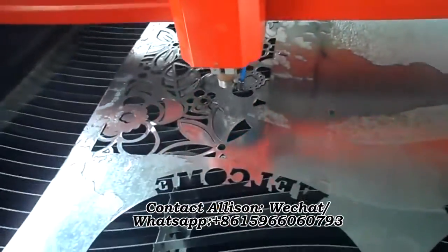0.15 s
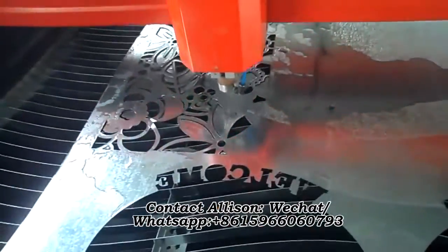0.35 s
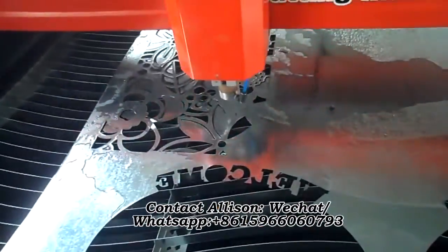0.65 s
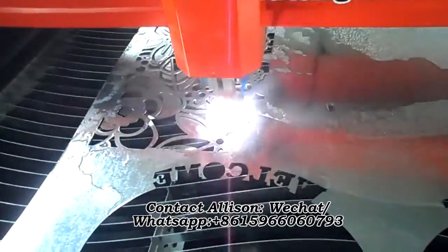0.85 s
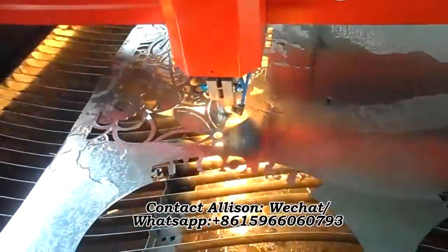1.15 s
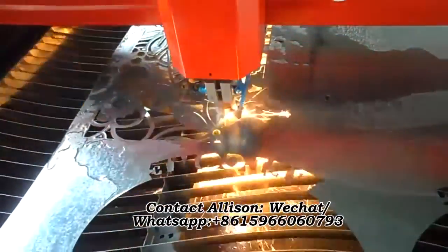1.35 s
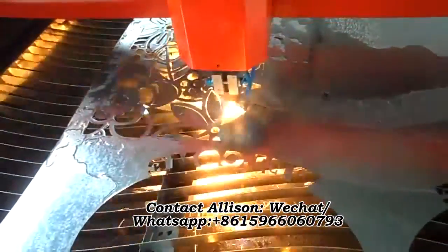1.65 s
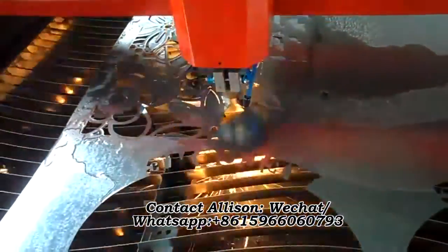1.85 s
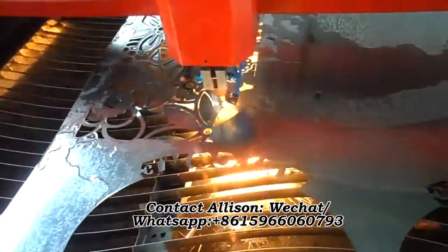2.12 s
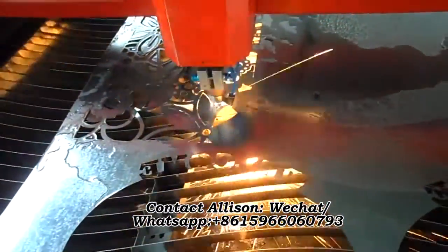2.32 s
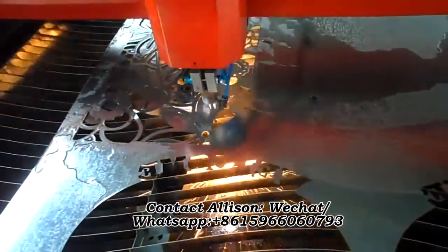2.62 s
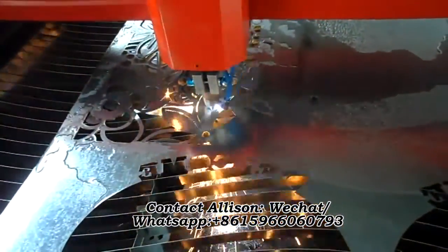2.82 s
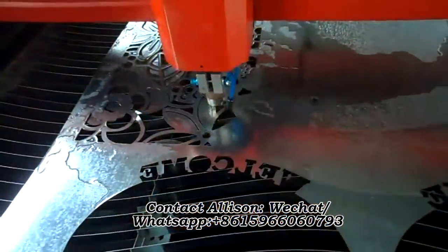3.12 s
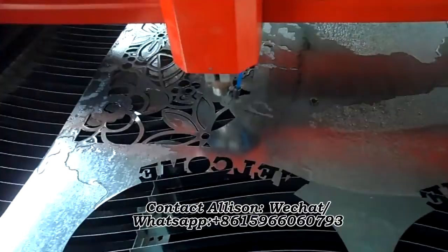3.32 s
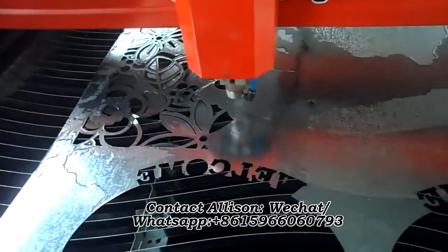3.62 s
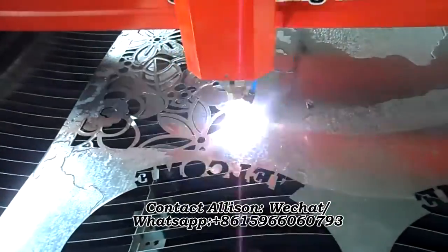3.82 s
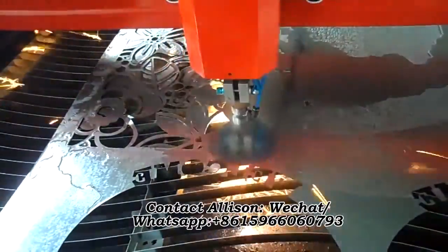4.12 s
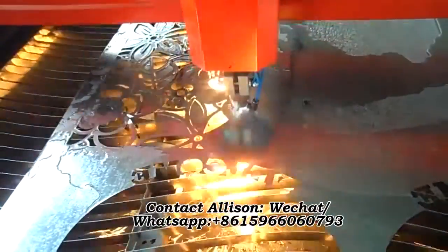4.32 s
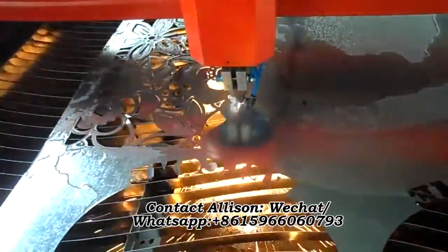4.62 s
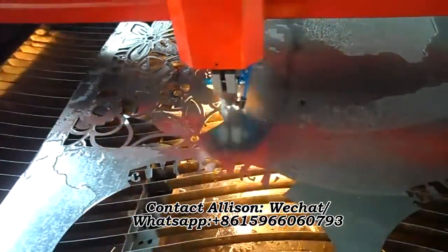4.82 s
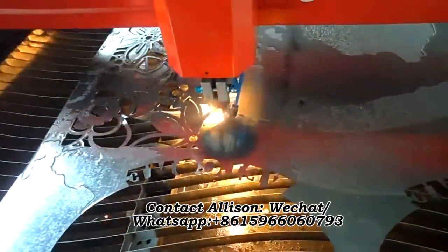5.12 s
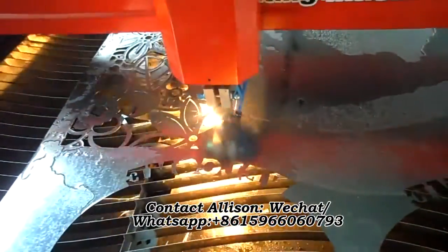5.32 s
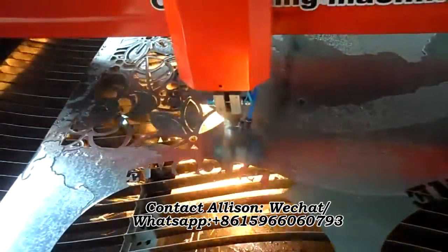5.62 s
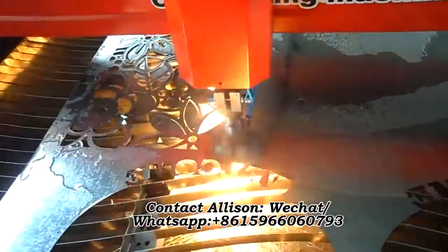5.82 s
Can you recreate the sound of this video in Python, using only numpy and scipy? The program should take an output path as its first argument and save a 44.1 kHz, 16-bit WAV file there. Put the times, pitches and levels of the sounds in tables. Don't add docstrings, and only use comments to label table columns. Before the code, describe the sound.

Loud pressurized gas hiss and sizzling jet cutting thin sheet metal in two passes, separated by a short quieter gap with sharp clacks.

```python
import sys
import numpy as np
from scipy import signal
from scipy.fft import rfft, irfft
from scipy.io import wavfile
from scipy.ndimage import uniform_filter1d

SR = 44100
rng = np.random.default_rng(int(sys.argv[2]) if len(sys.argv) > 2 else 0)


def natural_amplitude(level_db):
    exponent = np.asarray(level_db, float) / 20
    return 10 ** exponent


def waveform_to_disk(signal):
    frames = np.transpose(np.atleast_2d(signal))
    scaled = np.clip(frames, -1, 1) * 32767
    samples = np.round(scaled).astype(np.int16)
    wavfile.write(sys.argv[1], SR, samples)


N = 262395

CUTOFF_HZ = 15745
SPLITS_HZ = [850, 3900, 9500]

STAGE_S = [
    0,
    .911,
    1.121,
    3.0322,
    3.365,
    3.9938,
    4.219,
    5.95,
]
FADE_S = [.001, .004, .006, .006, .09, .004, .03, .001]
# table rumble in dB, splash in dB, jet hiss in dB, sizzle in dB,
# share of the microphone's level swing left in the jet (0 to 1).
BALANCE_DB = [
    (-37, -20, -23.5, -26, 0.15),
    (-38, -26, -22, -23.5, .45),
    (-37.5, -26, -25, -24.5, 0.26),
    (-38.5, -34, -33, -35, 0.63),
    (-34, -28, -31, -34, 0.78),
    (-34, -23, -21, -22.5, 0.32),
    (-33, -26, -23, -24.5, 0.6),
]

# frequency in Hz, level in dB.
BLOW_COLOUR = [(12, -38), (20, -9), (153, -7), (239, -8), (363, -19), (599, -7.5), (770, -18), (1140, -10),
               (1730, -12.5), (2620, -1), (3980, -13.5), (5260, -12.5), (7350, -3), (10600, -17.5),
               (15600, -12)]
PIERCE_COLOUR = [(12, -43), (20, -17), (119, -15), (186, -9.5), (353, -25), (394, -20), (814, -11),
                 (1050, -16), (1630, -2.5), (1830, -3), (2410, 1.5), (3870, -7), (6580, -4.5),
                 (12100, -7.5), (15600, -7)]
CUT_COLOUR = [(12, -39), (20, -4), (145, -7), (202, -4.5), (373, -17), (582, -14.5), (1540, -6.5),
              (1830, -8.5), (2100, -3), (2480, -5.5), (3280, -2.5), (3770, -5.5), (6050, -5.5),
              (12100, -11), (15600, -13.5)]
REST_COLOUR = [(12, -34), (20, -7), (93, -4), (186, -4), (267, -4), (334, -15), (669, -11), (770, -18.5),
               (1590, -19), (3190, -16.5), (4840, -22), (7560, -9), (8220, -14), (15600, -13)]
BLOW_AGAIN_COLOUR = [(12, -38), (20, -4.5), (113, -4.5), (226, -7), (373, -16.5), (669, -8.5), (791, -16.5),
                     (1140, -6.5), (1780, -6.5), (2770, 0), (3770, -11.5), (5260, -12.5), (7560, -10),
                     (10900, -22.5), (15600, -19)]
PIERCE_AGAIN_COLOUR = [(12, -44), (20, -8), (95, -9), (137, -11.5), (176, -10), (353, -19), (383, -16),
                       (441, -13), (616, -12), (708, -15), (1270, -17), (2480, -2.5), (3100, -10.5),
                       (6220, -3), (15600, -2)]
CUT_AGAIN_COLOUR = [(12, -37), (20, -6), (208, -5.5), (373, -16), (935, -9.5), (1080, -3), (1780, -1.5),
                    (2220, 0.5), (2620, -3.5), (3100, 0), (4100, -6.5), (6050, -4.5), (8690, -9),
                    (12500, -6), (15600, -9)]

# frequency in Hz, width in Hz, lift in dB.
BLOW_MODES = [(35, 11, -5), (82, 14, 2), (707, 12, 7.5), (1010, 12, 2.5), (622, 12, -0.5), (680, 35, 1.5),
              (480, 14, 3), (418, 6.8, 12.5), (2260, 160, -1), (2500, 390, -0.5), (3120, 170, 2),
              (3850, 470, -6), (4930, 150, 0), (6170, 320, 4), (7740, 130, 1.5), (9300, 300, 2.5),
              (10400, 2200, -2)]
PIERCE_MODES = [(612, 12, 7), (370, 54, -2), (1810, 97, -10), (3860, 240, -4), (6380, 450, 5.5),
                (7250, 250, 3), (11900, 500, 7)]
CUT_MODES = [(590, 56, 6), (210, 22, 5), (35, 9.6, 3.5), (87, 29, 4), (421, 18, 5.5), (506, 13, 4.5),
             (676, 21, 2), (1057, 59, 5), (344, 37, 0.5), (1790, 57, -6.5), (3260, 280, 2),
             (3650, 780, -3.5), (5900, 180, 1.5), (6100, 1100, 1.5), (7380, 220, 1.5)]
REST_MODES = [(3080, 280, 5), (2600, 300, -2), (5300, 900, 6.5), (1200, 200, 2), (7400, 300, 1)]
# frequency in Hz, width in Hz, lift in dB.
FIRST_CUT_MODES = [(2470, 220, -4.5), (4650, 83, -2.5), (5500, 250, -2.5), (9500, 1300, -3),
                   (10800, 250, 2), (12700, 250, 1), (13900, 300, 2), (5750, 200, 0.5)]
BLOW_AGAIN_MODES = [(1790, 120, -7), (2330, 80, 5), (2820, 220, 3.5), (3130, 250, -4), (3450, 120, 5.5),
                    (3870, 200, 2.5), (4870, 200, -3), (6100, 200, 0), (10300, 400, 1), (15400, 400, 1)]
PIERCE_AGAIN_MODES = [(1250, 200, 5), (2500, 200, -1), (4430, 200, 0), (5370, 300, 1.5), (9200, 250, -1),
                      (10800, 400, -0.5), (12300, 200, -2), (13500, 400, 0)]
CUT_AGAIN_MODES = [(2240, 100, 2.5), (3800, 200, 0), (5920, 370, -4.5), (8900, 300, -0.5), (10200, 300, -2),
                   (11250, 220, 0.5), (12000, 250, 0), (12400, 200, 5), (13700, 300, 3)]

# time in seconds, level in dB.
GAIN = [(0, 11), (.33, 7), (.8, 12.5), (.913, 10.5), (.925, 4.5), (1.3, 3), (2.3, 6.5), (2.5, 2.5),
        (3.0, 4), (3.2, 0.5), (3.65, 3), (3.994, 6), (4.006, -0.5), (4.4, -3.5), (5.3, 1.5), (5.76, 2.5),
        (5.93, -1.5), (5.95, -0.5)]
# peak in seconds, hiss in dB,
# rise in seconds, fall in seconds, extra sizzle in dB.
FLARES = [(1.127, -4, 0.0055, .012, 1.2), (1.2, 0, 0.083, .07, 3.5), (1.39, -3, 0.25, 0.038, -1),
          (1.445, 3.5, .03, 0.081, 0), (1.63, 3.5, 0.14, .07, -0.5), (1.85, 3, 0.036, .02, -3),
          (1.88, -1, .015, 0.063, .3), (2.09, 4, 0.18, 0.077, -3.5), (2.46, 6, 0.1, 0.076, 0.5),
          (2.805, 5, 0.073, 0.1, 1), (2.91, 0, .04, .03, -1), (3.0, 4.5, 0.11, 0.083, 0),
          (3.95, 2.5, 0.31, 0.089, 1), (4.32, 1, 0.083, .12, 3.5), (4.46, -7.5, .03, 0.059, 6),
          (4.59, -2, .12, .06, -5), (4.79, 5.5, .14, 0.14, 0.5), (5.3, 3, .08, .04, -5),
          (5.385, 0.5, 0.035, .05, 5), (5.42, 4, .04, 0.079, -6), (5.51, -1, .06, 0.073, -5),
          (5.69, 2, 0.017, .015, -8), (5.75, 5.5, 0.046, 0.21, -1.5), (5.925, 6, 0.044, 0.06, -2)]
# peak in seconds, level in dB,
# rise in seconds, fall in seconds.
SPLASHES = [(1.127, -4.5, 0.0074, 0.094), (1.21, -3.5, 0.049, 0.026), (1.408, -9, 0.02, 0.059),
            (1.72, 3.5, 0.029, .06), (1.85, 0, .05, .015), (1.88, -2, .015, 0.088), (2.24, 2.5, 0.13, 0.27),
            (2.45, 2, .06, 0.03), (2.69, -2, 0.037, 0.056), (2.8, 2, 0.061, .03),
            (2.89, -5.5, 0.065, 0.045), (3.03, 7.5, 0.054, 0.0054), (3.36, -3, 0.04, 0.12),
            (4.37, -2, 0.23, 0.022), (4.46, -7, .02, 0.055), (4.6, 3, 0.092, 0.061), (4.95, 3, 0.1, 0.25),
            (5.365, -5.5, 0.044, 0.08), (5.7, -5.5, 0.044, 0.048), (5.82, -2.5, .06, .06)]
RUMBLE_IN_SPLASH = 0.23

POP_S = [
    .9116,
    3.0288,
    3.0812,
    3.1037,
    3.994,
]
# crack peak in dB, thump in dB, thump pitch in Hz, crack length in seconds,
# frequency in Hz above which the crack is dull.
POPS = [(-5, -2.5, 1000, .0007, 10000), (-1, -8, 700, .001, 4000), (-5, -20, 1500, .0016, 14000),
        (-6.5, -30, 800, .0005, 7000), (-9, -6, 1400, .0015, 6000)]
CRACK_LOW_HZ = [900, 700, 900, 1900, 900]
# level in dB, fall in seconds.
PUFFS = [(2.5, 0.039), (4, 0.023), (0, .02), (5, 0.016), (2.5, .01)]
PUFF_RISE_S, PUFF_IN_SIZZLE = 0.0022, 0.15

# start in seconds, end in seconds, frequency in Hz,
# width in Hz, level in dB.
WHISTLES = [(1.68, 1.865, 3380, 150, -39), (1.47, 1.64, 12500, 140.0, -29), (1.6, 1.7, 10360.0, 210.0, -31),
            (1.76, 1.87, 6200, 500.0, -26), (1.96, 2.06, 3160, 230.0, -31), (2.17, 2.26, 2790, 200, -25),
            (2.41, 2.53, 7230, 160.0, -25), (4.35, 4.45, 12700.0, 414, -35), (4.35, 4.46, 6600, 310.0, -34),
            (4.76, 4.85, 5130, 200.0, -29), (4.89, 5.07, 5260, 350, -28), (5.17, 5.37, 3200, 600, -32),
            (5.37, 5.45, 12350, 230.0, -26), (5.395, 5.44, 5980, 340, -19.5), (5.44, 5.57, 6100, 130, -33),
            (5.68, 5.78, 12200, 248, -28), (3.45, 3.5, 4320, 120, -42), (3.35, 3.46, 10800, 1500, -37),
            (0.01, .35, 8960, 800, -28.5), (1.15, 1.4, 13000, 1500, -33), (2.66, 2.76, 11000, 2500, -24),
            (3.97, 4.21, 14800, 2000, -26)]
# start in seconds, end in seconds, frequency in Hz, width in Hz,
# level in dB.
MORE_WHISTLES = [(4.56, 5.93, 1075, 100, -39), (5.33, 5.44, 13500, 200, -33), (2.95, 3.03, 6050, 250, -30),
                 (1.68, 1.8, 1550, 150, -36), (3.38, 3.52, 2500, 700, -36), (1.46, 1.72, 6100, 250, -34),
                 (4.85, 5.25, 2280, 250, -36), (1.55, 1.87, 3350, 90, -37), (2.3, 2.84, 3200, 250, -34),
                 (4.09, 4.21, 12500, 1800, -28), (1.28, 1.4, 5000, 900, -31), (5.75, 5.9, 12400, 250, -32),
                 (2.74, 2.84, 12000, 300, -31), (2.76, 2.85, 8150, 200, -33),
                 (4.75, 4.84, 10700, 250, -32), (5.8, 5.94, 11150, 150, -34), (2.0, 2.35, 1100, 90, -40),
                 (1.56, 1.87, 3365, 60, -37), (3.55, 3.99, 7700, 900, -34), (1.82, 1.865, 4700, 500, -27),
                 (1.05, 1.12, 6900, 900, -26), (2.05, 2.13, 4900, 300, -31), (2.4, 2.5, 4700, 1300, -31),
                 (5.7, 5.85, 7500, 200, -35)]
# start in seconds, end in seconds,
# frequency in Hz, width in Hz, level in dB.
EDGE_TONES = [(4.74, 4.89, 7060, 200, -33), (4.67, 4.84, 11370, 160, -27), (5.65, 5.75, 12400, 170, -37),
              (5.56, 5.66, 4200, 150, -32), (5.51, 5.72, 17000, 250, -33), (5.35, 5.51, 12490, 120, -35),
              (1.7, 1.87, 7660, 200, -39), (5.58, 5.78, 9220, 170, -36), (5.54, 5.72, 6100, 110, -28),
              (4.25, 4.38, 10000, 100, -34), (4.26, 4.38, 11250, 120, -33), (1.92, 2.12, 2760, 83, -34.5),
              (1.57, 1.74, 12920, 200, -34), (5.61, 5.67, 1540, 120, -32), (5.06, 5.21, 1980, 76, -33),
              (4.77, 4.87, 2600, 88, -37), (4.96, 5.06, 8180, 100, -32), (2.8, 2.91, 2700, 100, -41.5),
              (1.17, 1.28, 6000, 100, -38), (4.25, 4.45, 2900, 130, -46), (4.27, 4.58, 2500, 140, -46),
              (4.27, 4.45, 5200, 120, -33), (1.6, 1.76, 5600, 150, -36), (1.79, 1.87, 3345, 86, -35),
              (.94, .98, 7000, 250, -23), (1.08, 1.12, 4750, 300, -31.5), (1.44, 1.5, 4150, 150, -33),
              (3.87, 3.93, 7750, 200, -37), (5.65, 5.94, 8180, 400, -35), (4.88, 5.04, 7600, 330, -31),
              (5.52, 5.94, 6800, 150, -32), (.01, .35, 15000, 1200, -31), (5.74, 5.94, 3700, 200, -34),
              (4.99, 5.13, 11000, 300, -32), (.5, .9, 7450, 130, -36), (0.26, 0.58, 2670, 350, -27.5),
              (4.26, 4.55, 10250, 500, -38), (3.74, 3.99, 15450, 300, -38), (0.84, 0.87, 3000, 150, -22),
              (2.05, 2.3, 3000, 80, -34)]
# start in seconds, end in seconds, pitch in Hz,
# wander in Hz, level in dB.
SINGING = [(1.44, 1.56, 3350, 35, -35), (1.555, 1.66, 3355, 25, -30), (1.68, 1.79, 3340, 50, -32),
           (1.79, 1.865, 3330, 45, -26.5), (5.4, 5.44, 6030, 110, -22), (5.43, 5.5, 6120, 60, -25.5),
           (5.5, 5.57, 6090, 40, -34), (.33, .9, 7480, 60, -31), (3.355, 3.42, 2930, 40, -35),
           (1.68, 1.76, 4980, 25, -33), (.66, .9, 2600, 90, -31), (.35, .62, 2620, 90, -31),
           (1.44, 1.54, 6150, 110, -32), (.02, .16, 3050, 90, -31), (3.6, 3.78, 2800, 40, -34),
           (3.8, 3.98, 3400, 50, -37)]
# frequency in Hz, level in dB.
MOTOR_TONES = [(35, -53.5), (86, -57.5), (506, -61), (608.3, -55.5), (662, -56.5), (731, -73),
               (990.5, -53.5), (1252, -56)]
# time in seconds, low edge in Hz,
# high edge in Hz, level in dB.
SIDE_PATCHES = [(.337, 13000, 14600, -35), (.476, 9600, 11100, -41), (2.241, 13000, 14600, -35),
                (2.729, 5600, 7700, -28), (3.426, 8900, 10400, -40), (3.449, 8900, 10400, -38),
                (3.472, 11000, 12500, -40), (4.354, 8200, 9800, -31), (4.61, 9000, 10400, -41),
                (5.926, 6200, 9800, -49)]


def unit(x):
    return x / np.sqrt(np.mean(x ** 2) + 1e-20)


def drift(rate_hz):
    step = 32
    r = np.exp(-2 * np.pi * rate_hz * step / SR)
    slow = signal.lfilter([1], [1, -2 * r, r * r], rng.standard_normal(N // step + 3002))
    slow = unit(slow[3000:])
    return np.interp(np.arange(N) / step, np.arange(len(slow)), slow)


def band(x, hz, width_hz):
    r = np.exp(-np.pi * width_hz / SR)
    ringing = [1, -2 * r * np.cos(2 * np.pi * hz / SR), r * r]
    for _ in range(2):
        x = signal.lfilter([1 - r, 0, r - 1], ringing, x)
    return x


def swings(rows, column):
    t = np.arange(N) / SR
    coarse = t[::16]
    total = np.zeros(len(coarse))
    for row in rows:
        peak, rise, fall = row[0], row[2], row[3]
        total += np.interp(coarse, [peak - rise, peak, peak + fall], [0, row[column], 0])
    return np.interp(t, coarse, total)


def levels():
    flare, splash = swings(FLARES, column=1), swings(SPLASHES, column=1)
    puff_rows = [(s + PUFF_RISE_S, db, PUFF_RISE_S, fall) for s, (db, fall) in zip(POP_S, PUFFS)]
    puff = swings(puff_rows, column=1)
    gain = np.interp(np.arange(N) / SR, *np.transpose(GAIN))
    sizzle = flare + swings(FLARES, column=4) + PUFF_IN_SIZZLE * puff
    return gain, [RUMBLE_IN_SPLASH * splash, splash + puff, flare + puff, sizzle]


def side_patches():
    out, length = np.zeros(N), 2048
    noises = rng.standard_normal((len(SIDE_PATCHES), length))
    for noise, (s, low_hz, high_hz, db) in zip(noises, SIDE_PATCHES):
        edges = [low_hz - 150, high_hz + 150]
        noise = signal.sosfilt(signal.cheby2(8, 50, edges, "band", fs=SR, output="sos"), noise)
        at = round(s * SR) - length // 2
        out[at:at + length] += natural_amplitude(db) * unit(noise) * np.hanning(length)
    return out


def motors(gain):
    t = np.arange(N) / SR
    out = np.zeros(N)
    for hz, db in MOTOR_TONES:
        waver_db = 1.5 * drift(2.4)
        out += natural_amplitude(db + gain + waver_db) * np.sin(2 * np.pi * hz * t)
    return np.sqrt(2) * out


def shop(x):
    t60_s = .15
    t = np.arange(round(.5 * SR)) / SR
    dull_noise = signal.lfilter([.5], [1, -.5], rng.standard_normal(len(t)))
    tail = dull_noise * natural_amplitude(-60 * t / t60_s) * (t > .003)
    return signal.fftconvolve(x, tail / np.sqrt(np.sum(tail ** 2)))[:N]


def pops():
    out, t = np.zeros(N), np.arange(2000) / SR
    cracks = rng.standard_normal((len(POPS), len(t)))
    for crack, s, low_hz, (db, thump_db, hz, length_s, dull_hz) in zip(cracks, POP_S, CRACK_LOW_HZ, POPS):
        at = round(s * SR)
        crack = signal.sosfilt(signal.butter(2, [low_hz, dull_hz], "band", fs=SR, output="sos"), crack)
        burst = crack * np.exp(-t / length_s) * (1 - np.exp(-t / .0003))
        thump = np.sin(2 * np.pi * hz * t) * np.exp(-1.5 * hz * t)
        out[at:at + len(t)] += natural_amplitude(db) * burst / np.abs(burst).max() - natural_amplitude(thump_db) * thump / thump.max()
    return out


def singing():
    out, tremble, throb = np.zeros(N), drift(56), natural_amplitude(3.5 * drift(25))
    for k, (start, end, hz, wander_hz, db) in enumerate(SINGING):
        a, b = round((start - .01) * SR), round((end + 0.012) * SR)
        pitch = hz + wander_hz * np.roll(tremble, 9001 * k)[a:b]
        tone = np.sqrt(2) * np.sin(2 * np.pi * np.cumsum(pitch) / SR)
        fade = signal.windows.tukey(b - a, min(1, .05 * SR / (b - a)))
        out[a:b] += natural_amplitude(db) * tone * np.roll(throb, 7001 * k)[a:b] * fade
    return out


def whistles():
    out = np.zeros(N)
    for start, end, hz, width_hz, db in list(WHISTLES) + list(MORE_WHISTLES) + list(EDGE_TONES):
        a, b = round((start - .01) * SR), min(round((end + 0.014) * SR), N)
        whistle = unit(band(rng.standard_normal(b - a), hz, width_hz))
        out[a:b] += natural_amplitude(db) * whistle * signal.windows.tukey(b - a, min(1, .06 * SR / (b - a)))
    return out * natural_amplitude(2.5 * drift(15))


def turbulence(echo_db, flutter_db, change_hz):
    jet = rng.standard_normal(N) * natural_amplitude(flutter_db * drift(11.7) + 0.78 * flutter_db * drift(140))
    lags = (np.geomspace(.001, .014, 14) * rng.uniform(.9, 1.1, 14) * SR).astype(int)
    echoes = sum(drift(change_hz) * np.roll(jet, lag) for lag in lags)
    power = 1 + natural_amplitude(2 * echo_db) * uniform_filter1d(echoes ** 2, size=4000)
    rippled = (jet + natural_amplitude(echo_db) * echoes) / np.sqrt(power)
    high = signal.butter(2, 900, "high", fs=SR, output="sos")
    return jet + signal.sosfiltfilt(high, rippled - jet)


def stage(noise, turn, swing, colour, modes):
    hz = np.maximum(np.fft.rfftfreq(N, 1 / SR), 1)
    colour_hz, colour_db = np.transpose(colour)
    shape_db = np.interp(np.log(hz), np.log(colour_hz), colour_db)
    for mode_hz, width_hz, lift_db in modes:
        shape_db = shape_db + lift_db / (1 + (2 * (hz - mode_hz) / width_hz) ** 2)
    above = [1] + [1 / (1 + (split / hz) ** 12) for split in SPLITS_HZ] + [0]
    inside = hz < CUTOFF_HZ
    coloured = rfft(noise) * natural_amplitude(shape_db) * inside

    (start, end), (rise, fall) = STAGE_S[turn:turn + 2], FADE_S[turn:turn + 2]
    span = slice(max(round((start - rise / 2) * SR), 0), round((end + fall / 2) * SR))
    t = np.arange(N)[span] / SR
    fade = np.sqrt(np.clip(np.minimum((t - start) / rise, (end - t) / fall) + .5, 0, 1))

    leak = unit(irfft(rfft(noise[::-1]) * inside / (1 + (13500 / hz) ** 8), N))
    out = np.zeros(N)
    gain, part_swings = swing
    *base_db, share = BALANCE_DB[turn]
    for k in range(4):
        part = unit(irfft(coloured * np.sqrt(np.maximum(above[k] - above[k + 1], 0)), N))
        gain_share = share
        if k == 0:
            part = part + natural_amplitude(-12) * leak
            gain_share = 1
        out[span] += fade * part[span] * natural_amplitude(base_db[k] + gain_share * gain[span] + part_swings[k][span])
    return out


def scene():
    blowing = turbulence(echo_db=-20.0, flutter_db=0.84, change_hz=0.6)
    cutting = turbulence(echo_db=-15.5, flutter_db=0.68, change_hz=3.46)
    plan = [(blowing, BLOW_COLOUR, BLOW_MODES),
            (cutting, PIERCE_COLOUR, PIERCE_MODES),
            (cutting, CUT_COLOUR, CUT_MODES + FIRST_CUT_MODES),
            (cutting, REST_COLOUR, REST_MODES),
            (blowing, BLOW_AGAIN_COLOUR, BLOW_MODES + BLOW_AGAIN_MODES),
            (cutting, PIERCE_AGAIN_COLOUR, PIERCE_MODES + PIERCE_AGAIN_MODES),
            (cutting, CUT_AGAIN_COLOUR, CUT_MODES + CUT_AGAIN_MODES)]
    swing = levels()
    gain = swing[0]
    jet = sum(stage(noise, turn, swing, colour, modes) for turn, (noise, colour, modes) in enumerate(plan))
    hits = pops()
    mix = jet + motors(gain) + whistles() + singing() + hits + natural_amplitude(-11) * shop(hits)
    return np.tile(mix, (2, 1))


def low_pass(x):
    return signal.sosfilt(signal.butter(12, 16990, fs=SR, output="sos"), x)


def record(dry):
    top_cut = signal.ellip(16, .3, 70, CUTOFF_HZ, fs=SR, output="sos")
    low_cut = signal.butter(4, 29.0, "high", fs=SR, output="sos")
    rounded = 1.384 * np.tanh(dry / 1.62)
    wet = signal.sosfilt(low_cut, signal.sosfilt(top_cut, rounded))
    return low_pass(wet + side_patches() * [[1], [-1]])


dry = scene()
out = record(dry)
waveform_to_disk(out)
```